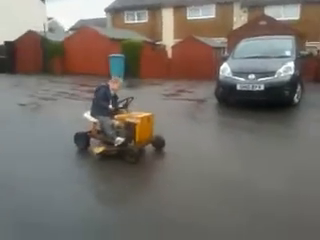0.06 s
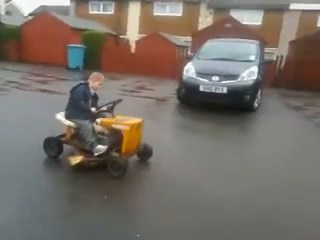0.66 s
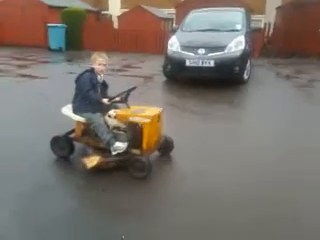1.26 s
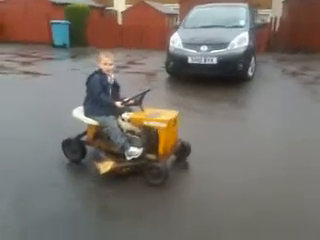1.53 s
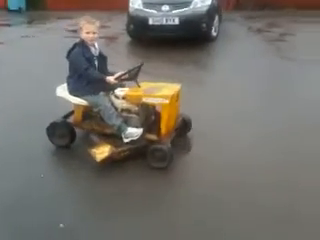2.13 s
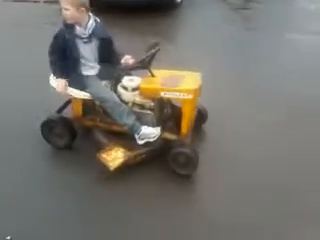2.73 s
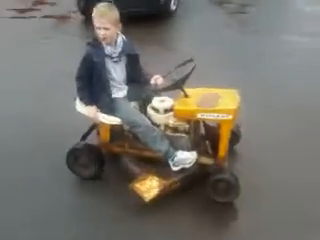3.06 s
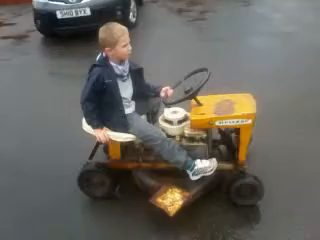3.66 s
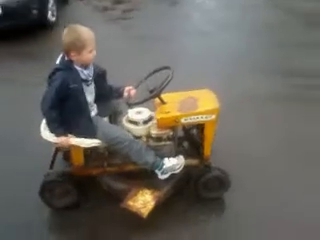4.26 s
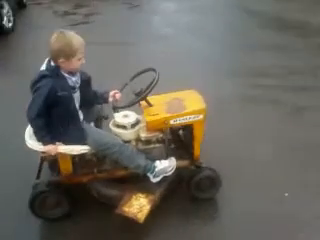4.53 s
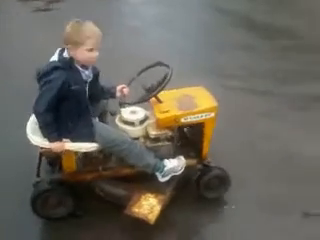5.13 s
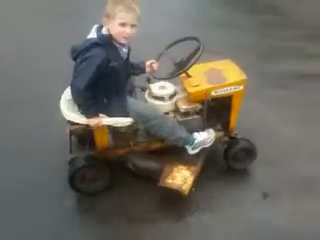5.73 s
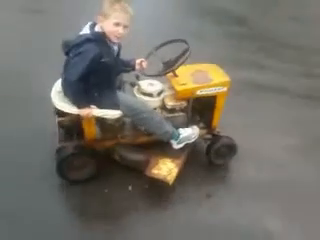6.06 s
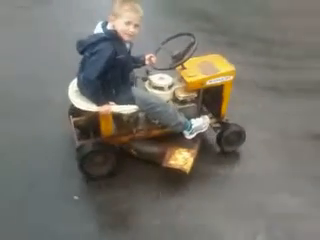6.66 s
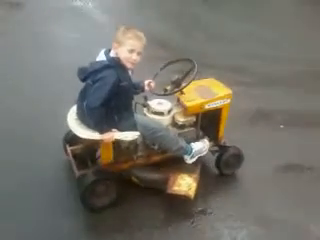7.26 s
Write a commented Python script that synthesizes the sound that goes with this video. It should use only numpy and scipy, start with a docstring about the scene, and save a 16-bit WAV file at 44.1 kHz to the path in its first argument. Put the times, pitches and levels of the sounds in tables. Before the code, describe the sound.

A small one-cylinder ride-on mower putters evenly across an outdoor car park, its rapid exhaust thumps mixed with rattling, ringing metal. The clatter builds as it comes near, then softens into a duller drone. Near the end a lever ticks, the drive clunks in and the engine suddenly runs harsher. The nearby microphone sounds dull, with slight crackle on the loudest putts.

```python
"""The exhaust of a small one-cylinder ride-on mower putts past on wet tarmac, about 14 times a second.
Each puff of gas thumps in the muffler, and each firing shakes the cutting deck and the hood into ringing,
over the clatter of the engine and the drone of the frame. A lever ticks, the drive clunks in, and the
running turns harsh. A pocket recorder with little treble holds down and clips the loudest putts."""
import sys
import numpy as np
from scipy import signal
from scipy.io import wavfile
from scipy.ndimage import uniform_filter1d, minimum_filter1d

SR = 44100
rng = np.random.default_rng(int(sys.argv[2]) if len(sys.argv) > 2 else 0)


def master(y):
    """Save y as 16-bit WAV."""
    cut = np.clip(np.atleast_2d(y).T, -1, 1)
    pcm = np.round(cut * 32767)  # scale
    wavfile.write(sys.argv[1], SR, pcm.astype(np.int16))


N = 321489
TIME = np.arange(N) / SR


def exhaust(putts, edge_db):
    """Each puff is a thump, a bark and a soft shove of air; more edge makes it start higher and harder."""
    thump = np.zeros(N + SR)
    for (s, db), (pitch, length, shape) in zip(putts, rng.standard_normal((len(putts), 3))):
        start = max(int((s - .001) * SR), 0)   # the valve cracks open just ahead of the blow
        edge = min(from_db(edge_db[start]), .6)
        wave = puff(hz=192 + 5 * pitch - 35 * edge, length_s=.0205 * from_db(.66 * length),
                    skew=(.95 - .5 * edge) * from_db(shape), glide_hz=30 + 120 * edge)
        thump[start:start + len(wave)] += from_db(db + .72) * wave
    thump = thump[:N]
    thump = thump - .6 * resonate(thump, hz=126.3, width_hz=55)   # the muffler traps a band below its boom
    bark = resonate(resonate(impulse(), hz=328, width_hz=300), hz=531, width_hz=120)
    shove = resonate(resonate(impulse(), hz=70.5, width_hz=160), hz=84, width_hz=49)
    barks = from_db(edge_db) * strike(putts, bark, delay_s=.0016)
    return thump + barks + from_db(-26) * strike(putts, shove)


def puff(hz, length_s, skew, glide_hz, cooling_s=.0058, softness=1.45):
    """The muffler's boom swells and fades while the valve is open; its pitch sinks as the gas cools."""
    age = np.arange(int(length_s * SR)) / SR
    turns = np.cumsum(hz + glide_hz * np.exp(-age / cooling_s)) / SR
    swell = np.sin(np.pi * (age / length_s) ** skew) ** softness
    return swell * -np.cos(2 * np.pi * turns)


# firings per second, wandering around the speed the engine tries to hold: t/s, f/Hz
FIRING_RATE = [(0.0, 13.053), (0.166, 12.752), (0.512, 14.109), (1.239, 12.959), (1.391, 13.531),
               (1.872, 13.897), (2.44, 12.83), (2.52, 13.57), (2.979, 14.105), (3.217, 13.235),
               (3.535, 12.902), (3.697, 14.116), (4.479, 13.13), (5.064, 14.12), (5.33, 13.449),
               (6.097, 13.674), (7.038, 13.939), (7.29, 13.014)]
# strength of the exhaust as the mower comes near and turns away: t/s, level/dB
EXHAUST_LEVEL = [(0, -6), (.45, -3.9), (1.05, -4.7), (2.35, -3), (3.5, -4), (6.3, -3), (6.7, -5),
                 (7.29, -5)]
# weak firings, where the fuel burns badly: t/s, level/dB against a full firing
WEAK_FIRINGS = [(.02, -9), (.84, -5.5), (6.44, -9.5)]

def firings(first_s=.021, db_per_hz=.4, scatter_db=.56):
    """The engine fires once a cycle and puffs harder when it runs faster. Gives rows of t/s, level/dB."""
    speed_hz, = in_time(FIRING_RATE)
    level_db, = in_time(EXHAUST_LEVEL)
    cycles = np.cumsum(speed_hz) / SR
    firing_cycles = np.arange(np.interp(first_s, TIME, cycles), cycles[-1])
    s = np.interp(firing_cycles, cycles, TIME)
    db = np.interp(s, TIME, level_db + db_per_hz * (speed_hz - speed_hz.mean()))
    for at_s, weak_db in WEAK_FIRINGS:
        db[np.argmin(np.abs(s - at_s))] += weak_db
    return np.c_[s, db + scatter_db * rng.standard_normal(len(s))]


# how loudly the cutting deck rattles: t/s, level/dB
DECK_LEVEL = [(0, -25.5), (.8, -21), (1.05, -21), (1.2, -28), (1.35, -18), (1.7, -24.5), (2.15, -19.5),
              (2.4, -23), (3, -17), (3.9, -18), (4.5, -23), (5, -23.5), (6.25, -30.5), (6.35, -23),
              (6.45, -35), (6.55, -21.5), (6.95, -27.5), (7.29, -25)]
# the notes the deck rings at: f/Hz, width/Hz, level/dB
DECK_NOTES = [(499, 94, -8.5), (613.3, 67, -1), (665.5, 61, -4.5), (792.5, 60, -8.5), (1010, 180, -17)]
# its strongest ring, which shifts as the mower turns: t/s, f/Hz
DECK_RING = [(0, 672), (.6, 697), (2.2, 692), (2.7, 721.8), (4.4, 702), (7.29, 720)]

def cutting_deck(putts, shake, edge_db):
    """Each firing jolts the metal cover over the blades, and it rattles on with one ring standing out."""
    level_db, ring_hz = in_time(DECK_LEVEL) + in_time(DECK_RING)
    tin = body(shake * rattle(per_s=300, spread_db=4, rush=.5, surge_db=2), DECK_NOTES)
    kicks = jolts(putts, delay_s=.013, scatter_s=.003, spread_db=2)
    kicks += shake * rattle(per_s=300, spread_db=2.5, rush=.27)
    ring = gliding(kicks, ring_hz * waver(depth=.011), width_hz=19.9)
    ring_db = 4.5 + .27 * (edge_db + 10.5)   # the ring carries best on the exhaust side
    tin = cut(tin + from_db(ring_db) * ring, 400, "high")
    return from_db(level_db) * steady(cut(tin, 1400, "low", order=4))


# how loudly the hood rattles: t/s, level/dB
HOOD_LEVEL = [(0, -26.5), (.15, -33), (.6, -23), (.9, -30.5), (1.05, -25.5), (2.55, -27), (2.72, -31.5),
              (3, -25.5), (3.6, -27.5), (4.2, -31), (5.1, -33), (6.27, -41), (6.42, -27.5), (6.7, -19.5),
              (6.9, -21), (7.29, -18)]
# the notes the hood rings at: f/Hz, width/Hz, level/dB
HOOD_NOTES = [(1010, 270, -6.5), (1183, 110, 0), (1423, 212, -2)]
# its strongest ring, which shifts as the mower turns: t/s, f/Hz
HOOD_RING = [(0, 1230), (1.8, 1516), (2.2, 1272), (4.4, 1291), (7.29, 1247)]

def hood(shake):
    """The shaking hood rattles and rings, higher than the deck."""
    level_db, ring_hz = in_time(HOOD_LEVEL) + in_time(HOOD_RING)
    tin = body(shake * rattle(per_s=250, spread_db=1.5, rush=.71), HOOD_NOTES)
    taps = shake * rattle(per_s=74, spread_db=3.5, rush=.12)
    ring = gliding(taps, ring_hz * waver(depth=.022), width_hz=50)
    tin = cut(tin + from_db(5.5) * ring, 950, "high", order=4)
    return from_db(level_db) * steady(cut(tin, 1850, "low", order=4))


# the engine's clatter, which jumps up when the drive takes the load: t/s, level/dB
CLATTER_LEVEL = [(0, -30), (.7, -29), (.92, -23.5), (1.1, -25.5), (1.45, -22), (2.5, -18.5), (2.77, -29.5),
                 (3.08, -19), (3.55, -21), (3.75, -32), (4.4, -34), (5.15, -42.5), (5.7, -43.5),
                 (6.15, -49), (6.55, -21.5), (6.9, -17), (7.29, -16.5)]
# the notes the engine's metal rings at: f/Hz, width/Hz, level/dB
ENGINE_NOTES = [(1728, 129, 1.5), (2150, 320, -1), (2455, 320, -3.5)]
# one more ring, which shifts as the mower turns: t/s, f/Hz, level/dB against those notes
ENGINE_RING = [(0, 1794, -.5), (.6, 1910, -0.5), (.95, 2010, 12.5), (1.3, 2290, -3), (2.1, 2342, 0),
               (2.2, 1813, -2.5), (2.6, 1986, 10), (3, 2067, 4), (4.4, 1892, 2), (5.5, 1976, -10),
               (6.4, 2242, 2.5), (7.29, 2358, -3.5)]

def engine_clatter(putts, shake):
    """The valves clack once a cycle, and loose metal gives a wavering ring."""
    level_db, ring_hz, ring_db = in_time(CLATTER_LEVEL) + in_time(ENGINE_RING)
    taps = shake * rattle(per_s=580, spread_db=4, rush=.91, surge_db=3)
    valves = from_db(-4.5) * jolts(putts, delay_s=.026, scatter_s=.0039, spread_db=5)
    loose_parts = shake * rattle(per_s=280, spread_db=.5, rush=.55)
    ring = gliding(valves + loose_parts, ring_hz * waver(depth=.025), width_hz=71)
    metal = rms_one(body(taps, ENGINE_NOTES)) + from_db(ring_db) * rms_one(ring)
    metal = cut(cut(metal, 1600, "high", order=4), 2914, "low", order=6)
    return from_db(level_db) * steady(metal)


# how loud the high rasp is: t/s, level/dB
RASP_LEVEL = [(0, -41.5), (1.1, -41.5), (1.4, -32), (1.75, -30), (2.2, -28.5), (2.42, -45.5), (2.72, -57),
              (3, -44.5), (3.14, -26.5), (3.5, -38), (3.75, -48), (4.2, -53), (5, -52.5), (6.25, -57.5),
              (6.35, -33.5), (6.52, -35.5), (6.7, -26), (7.29, -22.5)]
# the notes that colour the rasp: f/Hz, width/Hz, level/dB
RASP_NOTES = [(2520, 170, -0.46), (3070, 620, -0.54)]

def engine_rasp(shake):
    """Tiny, fast taps blur into a rasp on top of the clatter."""
    level_db, = in_time(RASP_LEVEL)
    taps = shake * rattle(per_s=740, spread_db=1, rush=.95, surge_db=3.5)
    rasp = cut(body(taps, RASP_NOTES), 2300, "high", order=4)
    return from_db(level_db) * steady(rasp)


# knocks in the drive: t/s, level/dB against one another
DRIVE_KNOCKS = [(5.528, -16), (5.597, -18), (6.36, -14), (6.3835, -8), (6.3875, -2), (6.3902, -1),
                (6.3972, -1), (6.404, -9), (6.415, -1)]
# the notes each knock rings at: f/Hz, width/Hz, level/dB
CLUNK_NOTES = [(328, 180, -0.5), (477, 210, 1.5), (910, 180, -5), (1500, 690, -11.5), (2800, 830, -22)]
# sharp ticks of a lever: t/s, level/dB
LEVER_TICKS = [(6.2945, -8.5), (6.305, -23)]

def drive_and_lever():
    """After two faint knocks a lever ticks, and the drive takes hold with a burst of gritty clunks."""
    age = np.arange(len(impulse())) / SR
    grit = rng.standard_normal(len(age)) * np.exp(-age / .0032)
    tick = resonate(grit, hz=2970, width_hz=770)
    tick = cut(cut(tick, 2100, "high"), 3500, "low", order=4)
    clunk = cut(body(impulse() + from_db(-18.5) * grit, CLUNK_NOTES), 3300, "low")
    return from_db(-1.5) * strike(DRIVE_KNOCKS, clunk) + strike(LEVER_TICKS, tick)


# the low notes of the air intake and frame: f/Hz, width/Hz, level/dB
DRONE_NOTES = [(193, 44, 0.5), (272, 96, 2), (453.4, 50, -6)]

def frame_drone(shake, drone_db, rumble_db):
    """The air intake and the frame drone between the putts, over a low rumble."""
    drone = body(shake * rattle(per_s=300, spread_db=2.5, rush=.96), DRONE_NOTES)
    drone = cut(cut(drone, 530, "low"), 130, "high")
    rumble = cut(cut(rng.standard_normal(N), 130, "low"), 75, "high")
    return from_db(drone_db) * steady(drone) + from_db(rumble_db) * rms_one(rumble)


# shaking from one firing to the next: share of the cycle, then level/dB for deck, clatter and drone
SHAKE_PATTERN = [(0, 2, 3.5, 1), (.1, -2.5, -0.5, -3.5), (.2, 2, 0, 0), (.38, -0.5, 2.5, -6.5),
                 (.52, -2, 2, -6), (.7, -3, 2.5, -3), (.85, -3, 0.5, 0.5), (1, -5.5, 1, -4)]

def shaking(putts):
    """The parts shake harder and softer in the same pattern after every firing."""
    s = putts[:, 0]
    s = np.r_[2 * s[0] - s[1], s, 2 * s[-1] - s[-2]]   # one extra cycle at each end
    phase = np.interp(TIME, s, np.arange(len(s))) % 1
    share, *columns = np.transpose(SHAKE_PATTERN)
    return [rms_one(from_db(np.interp(phase, share, db))) for db in columns]


def rattle(per_s, spread_db, rush, surge_db=2.5):
    """Many small, uneven taps in a smooth rush of noise, coming in flurries."""
    taps = (rng.random(N) < per_s / SR) * rng.choice([-1, 1], N)
    taps = rms_one(taps * from_db(spread_db * rng.standard_normal(N)))
    flurries = rms_one(cut(rng.standard_normal(N), 24, "low"))
    return rms_one((taps + rush * rng.standard_normal(N)) * from_db(surge_db * flurries))


def jolts(putts, delay_s, scatter_s, spread_db):
    """One blow a little after each firing, never quite the same."""
    late, strength = rng.standard_normal((len(putts), 2)).T
    blows = putts + np.c_[delay_s + scatter_s * late, spread_db * strength]
    return rms_one(strike(blows, impulse()))


def strike(events, sound, delay_s=0.):
    """Plays a sound at each event, peaking at the event's level."""
    s, db = np.transpose(events)
    starts = np.clip(np.round((s + delay_s) * SR).astype(int), 0, N - 1)
    clicks = np.zeros(N)
    np.add.at(clicks, starts, from_db(db))
    return signal.fftconvolve(clicks, sound / np.abs(sound).max())[:N]


def body(x, notes):
    """Rings at several notes at once, with every second one turned upside down."""
    return sum((-1) ** k * from_db(db) * resonate(x, hz, width) for k, (hz, width, db) in enumerate(notes))


def gliding(x, hz, width_hz, size=256):
    """A ring whose pitch moves."""
    out, state = np.zeros(N), np.zeros(2)
    for i in range(0, N, size):
        out[i:i + size], state = signal.lfilter(*resonator(hz[i], width_hz), x[i:i + size], zi=state)
    return out


def resonate(x, hz, width_hz):
    """Rings at one note; a narrower width rings longer."""
    return signal.lfilter(*resonator(hz, width_hz), x + 1e-18)


def resonator(hz, width_hz):
    """Filter numbers that let one note through at full strength."""
    r = np.exp(-np.pi * width_hz / SR)
    return (1 - r * r) / 2 * np.array([1, 0, -1]), [1, -2 * r * np.cos(2 * np.pi * hz / SR), r * r]


def waver(depth, hz=14):
    """A factor that wanders around 1."""
    return 1 + depth * rms_one(cut(rng.standard_normal(N), hz, "low"))


def steady(x, span_s=.16):
    """Evens the level out to 1 over a couple of engine cycles."""
    return x / np.sqrt(uniform_filter1d(x * x, int(span_s * SR)) + 1e-12)


def cut(x, hz, keep, order=2):
    """Keeps the "low" or the "high" side of hz."""
    return signal.sosfilt(signal.butter(order, hz, keep, fs=SR, output="sos"), x)


def in_time(rows):
    """A list of curves, one for each column after t/s, with a value at every sample."""
    s, *columns = np.transpose(rows)
    return [np.interp(TIME, s, c) for c in columns]


def impulse(size=4096):
    return signal.unit_impulse(size)


def from_db(db):
    return 10 ** (np.asarray(db) / 20)


def rms_one(x):
    return x / np.sqrt(np.mean(x ** 2) + 1e-20)


# as the mower turns away, the puffs lose their hard edge and the frame drones more:
# t/s, then level/dB for edge, drone and rumble
TURNING_AWAY = [(0, -6, -31.5, -43.5), (1.1, -7, -30, -40.5), (2, -9.5, -26, -39.5), (3, -19, -24.5, -40.5),
                (4.2, -18.5, -22, -45), (5.1, -19, -21.5, -50.5), (6.3, -22.5, -23.5, -56),
                (6.7, -14.5, -22.5, -37), (7.29, -16, -23.5, -34)]

def scene():
    """The firings drive the exhaust and shake every part of the mower."""
    putts = firings()
    edge_db, drone_db, rumble_db = in_time(TURNING_AWAY)
    deck_shake, clatter_shake, drone_shake = shaking(putts)
    machine = cutting_deck(putts, deck_shake, edge_db) + hood(clatter_shake)
    machine += engine_clatter(putts, clatter_shake) + engine_rasp(clatter_shake)
    machine += frame_drone(drone_shake, drone_db, rumble_db)
    return (exhaust(putts, edge_db) + machine + drive_and_lever())[None]


def limiter(x, threshold_db, release_db_per_s, size=88):
    """Turns the level down just ahead of each loud peak, then quickly back up."""
    over_db = np.maximum(20 * np.log10(np.abs(x) + 1e-9) - threshold_db, 0)
    release_db = release_db_per_s * TIME
    dip_db = np.maximum.accumulate(over_db + release_db, axis=-1) - release_db
    return x * from_db(uniform_filter1d(minimum_filter1d(-dip_db, size), size))


def record(dry, clip_level=.715):
    """Holds down the peaks, dulls the treble like a telephone, and clips the tallest putts to a crackle."""
    limited = limiter(dry, threshold_db=-1.35, release_db_per_s=298)
    dull = cut(cut(limited, 3610, "low", order=8), 4200, "low", order=14)
    return cut(np.clip(dull, -clip_level, clip_level), 15900, "low", order=16)


dry = scene()
out = record(dry)
master(out)
```